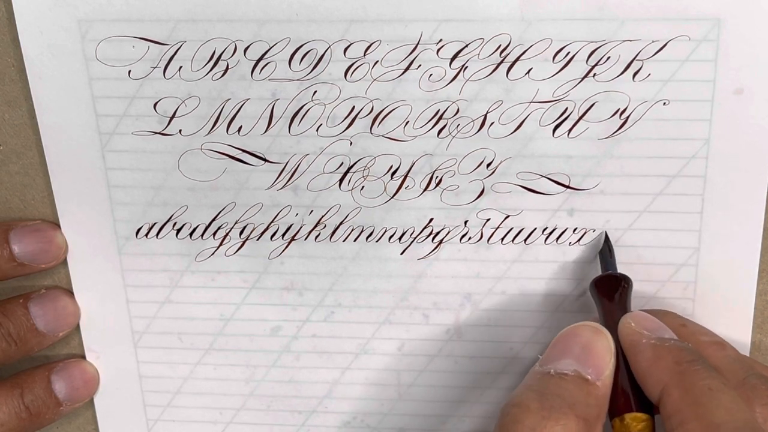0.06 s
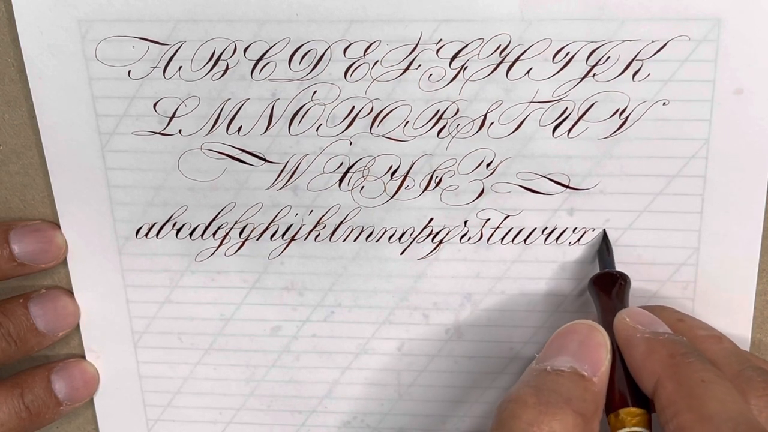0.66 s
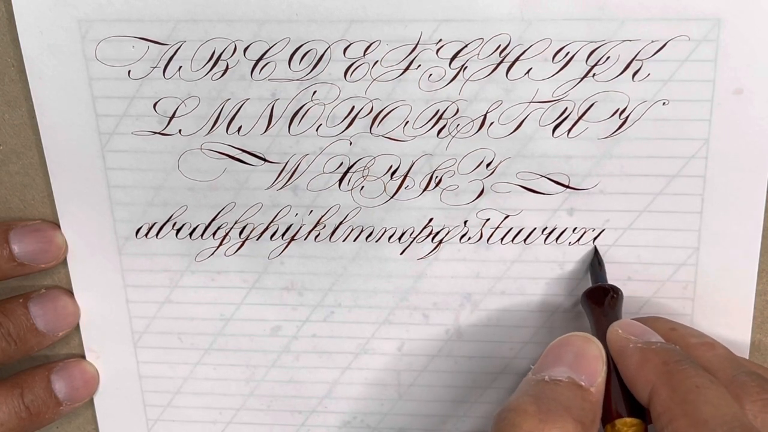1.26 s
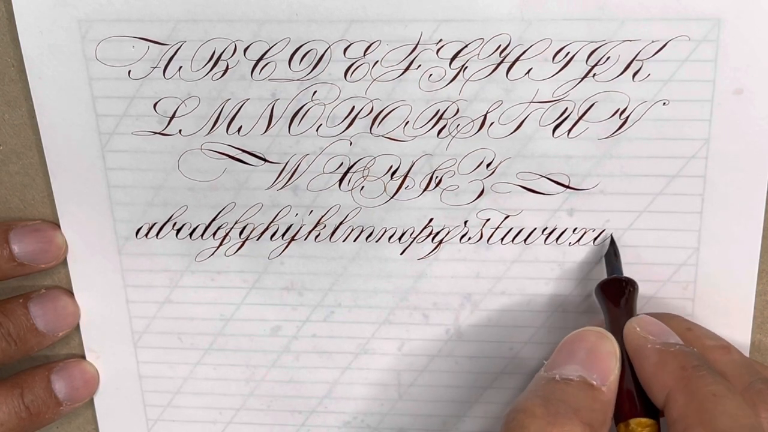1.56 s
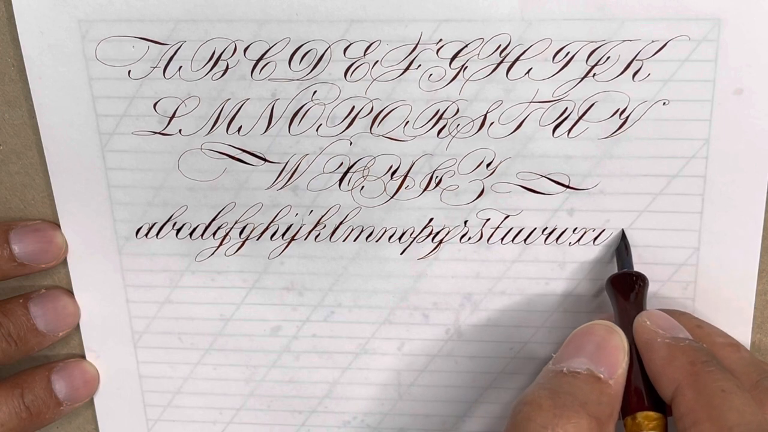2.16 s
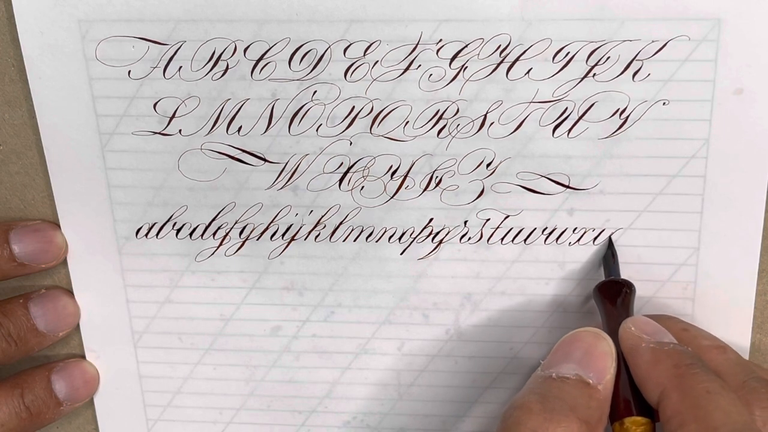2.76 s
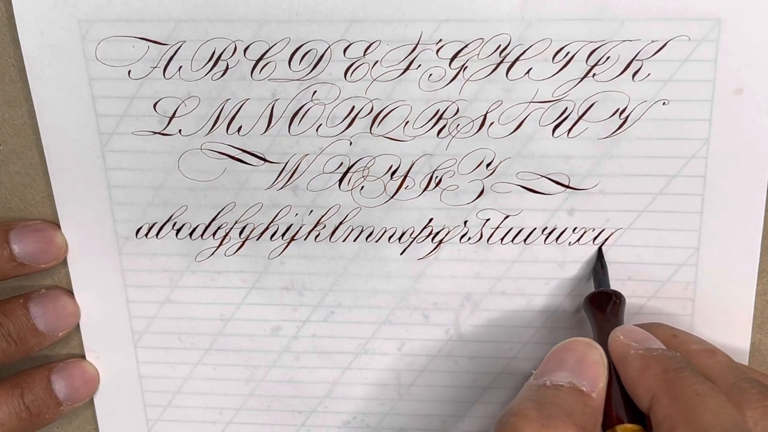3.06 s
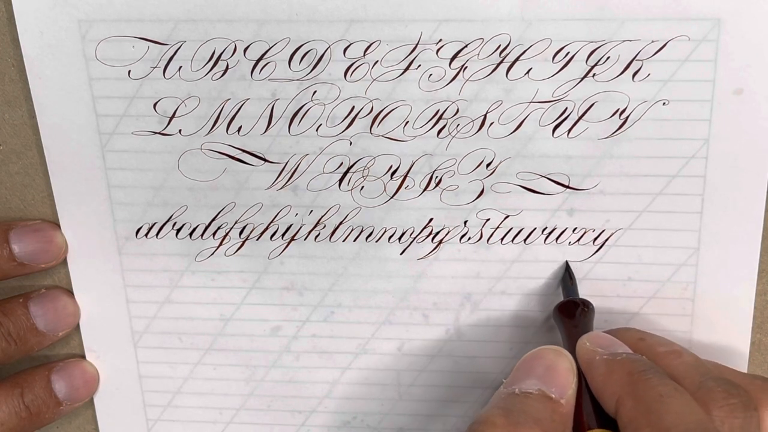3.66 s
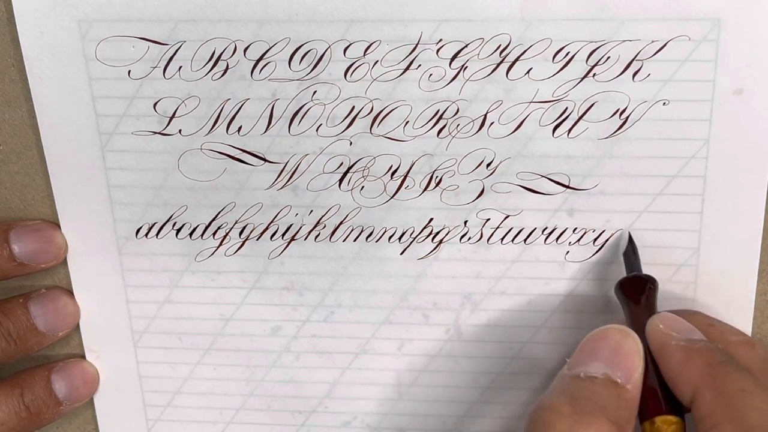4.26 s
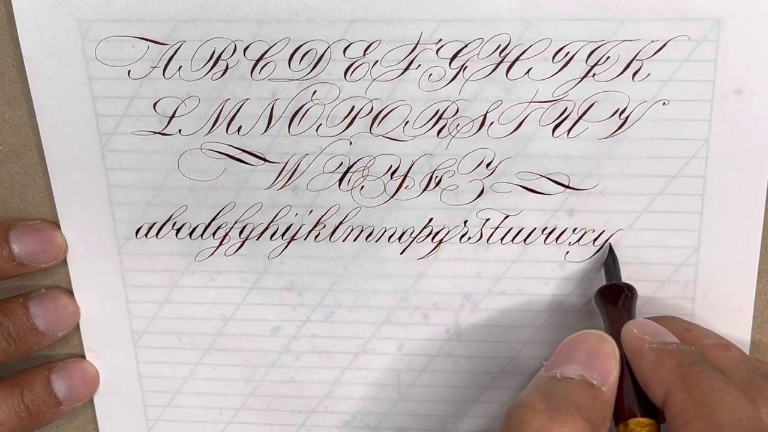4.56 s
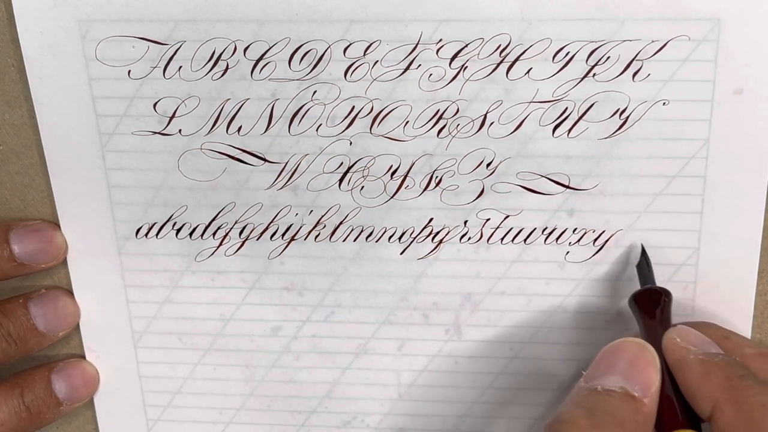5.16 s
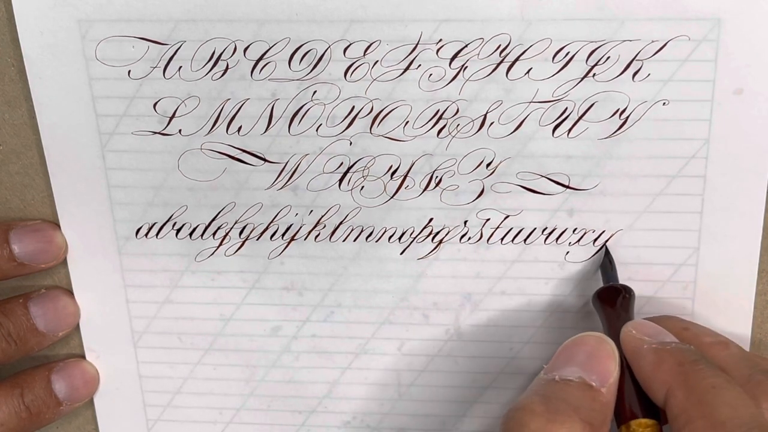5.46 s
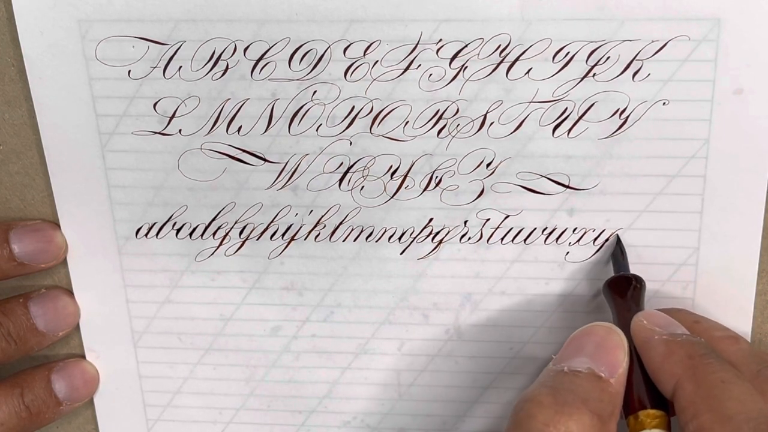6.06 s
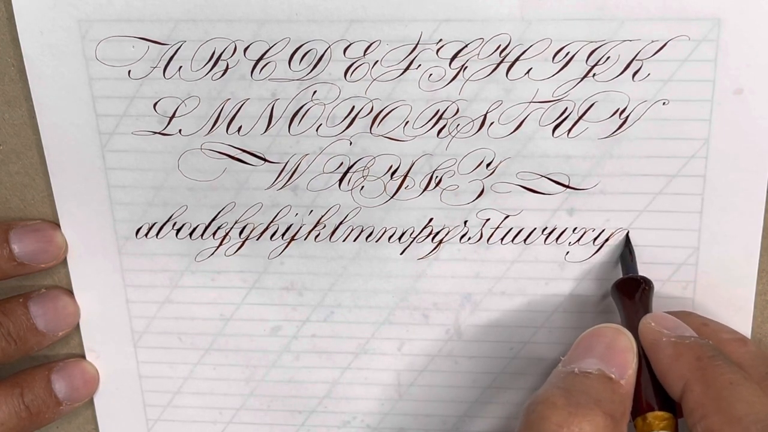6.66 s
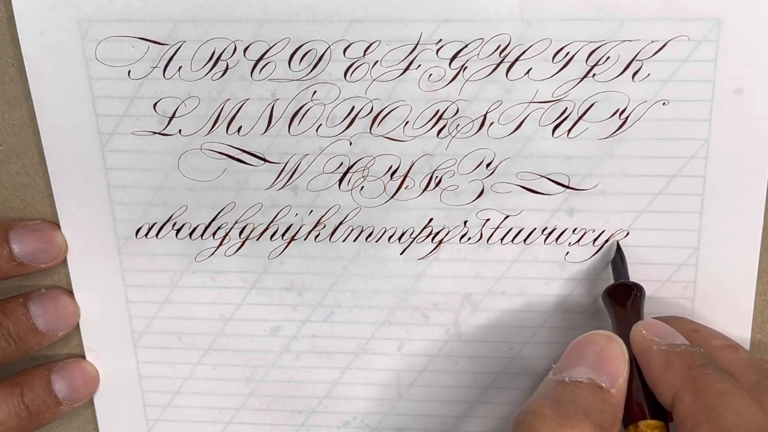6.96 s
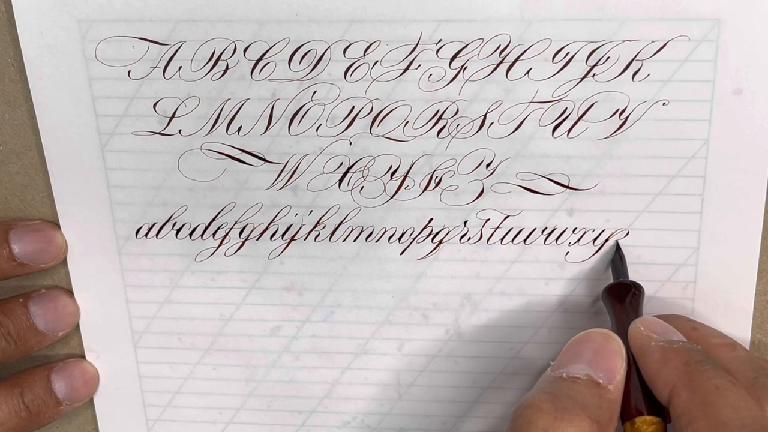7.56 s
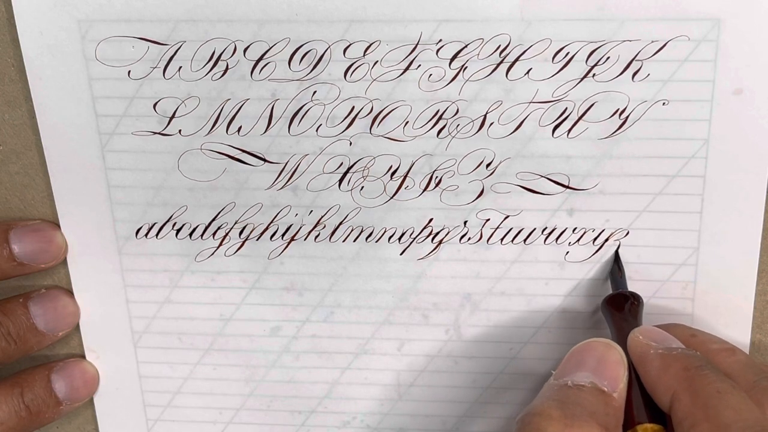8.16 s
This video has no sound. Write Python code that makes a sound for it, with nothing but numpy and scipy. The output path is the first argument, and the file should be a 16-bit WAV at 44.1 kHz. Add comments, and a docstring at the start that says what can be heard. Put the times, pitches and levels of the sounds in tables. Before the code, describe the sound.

A dip pen nib scratches across paper in short, crisp, ticking strokes with pauses between, close up in a quiet room.

```python
"""A pointed dip pen writing on paper on a desk, close to a phone's microphones in a quiet room.
The steel nib catches on paper fibres and flicks free: each flick rings nib and holder, taps the desk
and crackles the sheet. Between the flicks the tip drags finely, and now and then the hand slides
over the paper. Behind it lies the room tone: a soft rumble, hiss and two faint electrical whines."""
import sys
import numpy as np
from scipy import signal
from scipy.fft import rfft, irfft
from scipy.io import wavfile
from scipy.ndimage import uniform_filter1d

SR = 44100
rng = np.random.default_rng(int(sys.argv[2]) if len(sys.argv) > 2 else 0)


def master(y):
    """Save y as 16-bit WAV."""
    cut = np.clip(np.atleast_2d(y).T, -1, 1)
    pcm = np.round(cut * 32767)  # scale
    wavfile.write(sys.argv[1], SR, pcm.astype(np.int16))


N = 367353
TIME, BINS_HZ = np.arange(N) / SR, np.arange(N // 2 + 1) * SR / N

# the nib hooks a fibre and snaps free: t/s, shank ring level/dB, number of slips
CATCHES = [(0.512, -65.5, 1), (0.641, -51.5, 1), (0.668, -42, 1), (0.7067, -42, 1), (0.738, -43.5, 1),
           (0.7579, -39, 1), (0.7635, -35.5, 1), (0.769, -43, 1), (0.78, -41.5, 1), (0.8065, -45.5, 2),
           (0.8238, -46, 1), (0.854, -37, 1), (0.896, -40, 1), (0.9087, -37, 1), (0.932, -41.5, 1),
           (0.9476, -41, 1), (0.9871, -38, 1), (0.993, -46, 1), (1.0322, -38.5, 2), (1.0502, -42, 2),
           (1.1362, -37.5, 1), (2.3581, -48, 1), (2.3863, -46, 1), (2.4046, -48.5, 1), (2.4497, -48.5, 1),
           (2.484, -47.5, 1), (2.5647, -45.5, 1), (2.5988, -39.5, 1), (2.6153, -46, 1), (2.647, -45.5, 1),
           (2.6835, -39, 1), (2.6944, -41.5, 1), (2.716, -42.5, 1), (2.75, -48, 1), (2.7703, -44, 1),
           (2.7892, -37, 4), (2.8446, -40.5, 2), (2.8843, -36, 1), (2.894, -42.5, 2), (2.929, -38, 1),
           (2.962, -40.5, 1), (2.9657, -41, 1), (2.9981, -41, 1), (3.0265, -44.5, 1), (3.0658, -41.5, 1),
           (3.0945, -34, 1), (3.119, -35.5, 1), (3.1316, -37.5, 1), (3.1509, -38, 2), (3.1615, -31, 1),
           (3.1855, -42, 1), (3.1945, -35, 4), (3.226, -39.5, 1), (3.2346, -38, 1), (3.2394, -32.5, 2),
           (3.2544, -36, 3), (3.2853, -35, 2), (3.3043, -39, 1), (3.322, -40.5, 1), (3.347, -36.5, 4),
           (3.3682, -44, 1), (3.3884, -44.5, 1), (3.705, -54, 2), (3.7173, -51.5, 1), (3.7373, -38.5, 2),
           (3.7605, -41, 1), (3.7701, -38.5, 1), (3.8044, -35, 1), (4.0098, -42, 1), (4.0374, -36, 1),
           (4.0455, -43, 2), (6.0198, -64, 1), (6.06, -69, 1), (6.095, -65, 1), (6.1144, -56.5, 1),
           (6.624, -56, 1), (6.6703, -45, 2), (6.6921, -43, 1), (6.7077, -37.5, 1), (6.7426, -37.5, 1),
           (6.7583, -33, 2), (6.7845, -44, 1), (6.7946, -44.5, 1), (6.8089, -45.5, 1), (7.82, -64, 1),
           (7.9145, -54, 1), (7.9753, -48.5, 1), (8.033, -39.5, 1), (8.1845, -41.5, 1), (8.2094, -41.5, 1),
           (8.2347, -39, 1), (8.2507, -35, 2), (8.2786, -43, 1), (8.3013, -33.5, 5)]
# pen strokes: start/s, end/s, drag/dB, desk rub/dB, snags/dB, sheet against ring/dB,
# tine tips against ring/dB, pressure at start/0-1, pressure at end/0-1
STROKES = [(0.63, 0.746, -75, -80, -58, -22, -2.5, 0.23, 0.7),
           (0.745, 0.838, -65, -60.5, -48, -13.5, -0.5, 0.44, 0.93),
           (0.85, 1.173, -82, -70, -60, -20, 0, 0.55, 0.87),
           (1.362, 1.456, -54, -83, -58, -25, 4, 0.5, 0.2),
           (2.351, 2.55, -70, -97, -57.5, -27, -5.5, 0, 0.6),
           (2.553, 3.05, -68, -67.5, -48.5, -17, -1, 0.26, .8),
           (3.058, 3.429, -61, -65.5, -44.5, -20, -0.5, 0.71, 0.09),
           (3.711, 3.86, -60.5, -75, -59, -7, 6, 0.57, 0.75),
           (4.025, 4.068, -55, -76, -54, -13, -3, 0.46, 0.9),
           (5.999, 6.125, -79, -89, -72, -17, 5.5, .5, .5), (6.615, 6.73, -81, -75, -55, -15, -0.5, 1, 0.6),
           (6.735, 6.816, -51.5, -82, -41, -24, 1, 0.56, 0.03),
           (7.97, 8.18, -79, -63.5, -72, -19.5, -3, 0.57, 0),
           (8.181, 8.361, -65, -81, -44, -20, -1.5, 0.63, 0.38)]


def nib(drag, flick):
    """Flicks and fine drag ring the shank and the tine tips; the steel sings on faintly."""
    # modes of holder and shank, thin tine tips and lasting steel ring: f/Hz, width/Hz, level/dB
    shank_modes = [(2664, 110, -26.5), (3025, 90, -15), (4532, 280, -6.5), (5072, 109, -6), (5320, 460, -5),
                   (6274, 228, -0.5), (7850, 300, -14.5), (8406, 300, 4.5)]
    tip_modes = [(9900, 560, -30), (10660, 290, 8), (10740, 420, 9.5), (12100, 120, 2.5),
                 (12360, 230, -11.5), (14300, 380, -27.5), (15200, 150, -14.5)]
    steel_modes = [(5001, 12, 0), (6501, 12, -2), (8411, 26, -2), (8607, 26, -1), (12151, 16, -3)]
    shank = flicks(shank_modes, flick["times"], flick["ring"], rise_s=.0007, rasp=.099, rasp_s=.0008)
    shank += undb(-2) * resonate(shank_modes, drag)
    tips = flicks(tip_modes, flick["times"], flick["tips"], rise_s=.00016, rasp=.26, rasp_s=.0015)
    tips += undb(-3) * resonate(tip_modes, drag)
    steel = undb(-29) * resonate(steel_modes, shank + tips, rise_s=.0015, size=8192)
    return room(shank + tips + steel, wet_db=-17)


def releases():
    """Times (s) and levels (dB) of all flicks; a pressed nib taps the desk harder and damps its tips."""
    start, end, _, _, _, sheet_db, tip_db, press_from, press_to = np.transpose(STROKES)
    times, ring_db = np.vstack([snags(), slips()]).T
    stroke = np.argmin(np.maximum(start - times[:, None], times[:, None] - end), axis=1)  # nearest
    progress = np.clip((times - start[stroke]) / (end - start)[stroke], 0, 1)
    pressure = np.clip(press_from[stroke] + progress * (press_to - press_from)[stroke], 0, 1)
    tap_chance, tip_chance = rng.standard_normal((2, len(times)))
    tap_db = np.interp(pressure, (0, 1), (-29.5, -2.5)) + 1.86 * tap_chance
    damping_db = np.interp(pressure, (0, 1), (5, -6.5)) + 2 * tip_chance
    return dict(times=times, ring=ring_db, sheet=ring_db + sheet_db[stroke],
                desk=ring_db + tap_db, tips=ring_db + tip_db[stroke] + damping_db)


def slips(gap_s=.005, jitter=.15, loss_db=2):
    """Each catch lets go in one slip or in a fading stutter: rows of t/s, level/dB."""
    return [(s + gap_s * (k + min(k, 1) * jitter * rng.standard_normal()), db - k * loss_db)
            for s, db, number in CATCHES for k in range(round(number))]


def snags(count=170, hook_s=.016, hush_db=-17, spread_db=3.5):
    """Small random snags, strongest mid-stroke, hushed while the nib is hooked: rows of t/s, level/dB."""
    start, end, _, _, snag_db, *_ = np.transpose(STROKES)
    written_s = np.cumsum(end - start)
    along_s = (np.arange(count) + rng.uniform(-1, 2, count)) / count % 1 * written_s[-1]
    stroke = np.searchsorted(written_s, along_s)
    times = end[stroke] - written_s[stroke] + along_s
    to_catch_s = np.transpose(CATCHES)[0] - times[:, None]
    hooked = np.any((to_catch_s > 0) & (to_catch_s < hook_s), axis=1)
    speed_db = 20 * np.log10(arch(times, start[stroke], end[stroke], power=.5) + 1e-9)
    levels_db = snag_db[stroke] + speed_db + hush_db * hooked + spread_db * rng.standard_normal(count)
    return np.transpose([times, levels_db])


def flicks(modes, times, levels_db, rise_s, rasp, rasp_s):
    """Each release is a sharp slip and a brief rasp of tearing fibre, so no two ring alike."""
    t = np.arange(SR * 3 // 1000) / SR
    pushes = rasp * rng.standard_normal((len(times), len(t))) * np.exp(-t / rasp_s)
    pushes[:, 0] += 1  # the slip
    out = np.zeros(N + SR)
    for s, db, push in zip(times, levels_db, pushes):
        click = np.convolve(push, response(modes, rise_s, vary_db=1.56, detune=.015))
        click *= np.sqrt(len(t) / np.sum(click ** 2))  # energy of 3 ms at rms 1
        start = int(np.clip(s * SR, 0, N))
        out[start:start + len(click)] += undb(db) * click
    return out[:N]


def response(modes, rise_s, size=1024, vary_db=0, detune=0):
    """Damped modes build up as a push spreads; pitch and shares can vary from contact to contact."""
    t = np.arange(size) / SR
    hz, width, db = np.transpose(modes)[:, :, None]
    hz = hz * (1 + detune * rng.uniform(-1.1, 1, hz.shape))
    rings = (1 - np.exp(-t / rise_s)) * np.exp(-np.pi * width * t) * np.sin(2 * np.pi * hz * t)
    shares = undb(db + vary_db * rng.standard_normal(db.shape))
    out = np.sum(shares * rings / np.linalg.norm(rings, axis=1, keepdims=True), axis=0)
    return out / np.linalg.norm(out)


def resonate(modes, push, rise_s=.0005, size=1024):
    """A body rings in its modes under a running push."""
    return signal.fftconvolve(push, response(modes, rise_s, size))[:N]


def grains(per_s, spread_db):
    """Paper texture: random tiny impacts, many weak and few strong; rms 1."""
    sizes = undb(spread_db * np.minimum(rng.exponential(size=N), 4))
    return unit((rng.random(N) < per_s / SR) * sizes * rng.standard_normal(N))


def paper_on_desk(drag, rub_gain, flick):
    """Each flick taps the desk through the paper and crackles the sheet; the moving tip rubs both."""
    # modes of the desk and of the sheet on it: f/Hz, width/Hz, level/dB
    desk_modes = [(713, 57, -6.5), (891, 262, 6), (1333, 590, -1)]
    sheet_modes = [(1156, 320, 8), (1740, 580, -3.5), (2580, 450, 7.5), (3640, 440, 5)]
    taps = flicks(desk_modes, flick["times"], flick["desk"], rise_s=.0007, rasp=.33, rasp_s=.0008)
    crackle = flicks(sheet_modes, flick["times"], flick["sheet"], rise_s=.00035, rasp=.2, rasp_s=.00092)
    crackle += undb(-10.5) * resonate(sheet_modes, drag)
    rub = resonate(desk_modes, grains(per_s=200, spread_db=1) * rub_gain + undb(-14) * drag)
    return room(taps + crackle + rub, wet_db=-10)


def hand():
    """The side of the hand brushes the sheet as it shifts."""
    # slides: middle/s, length/s, level/dB
    slides = [(0.068, .16, -68), (4.224, 0.17, -66), (4.995, 0.18, -62.5), (6.0, 0.62, -77)]
    # spectrum of skin on paper: f/Hz, level/dB
    skin = [(160, 9), (260, 17.5), (550, -1), (1800, -0.5), (3300, -3), (4800, -1), (6500, -6),
            (10800, 1.5), (11800, -6), (13000, -36)]
    sliding = sum(undb(db) * arch(TIME, s - length / 2, s + length / 2, power=1.38)
                  for s, length, db in slides)
    return unit(colour(grains(per_s=7100, spread_db=.5), skin)) * sliding


def room(x, wet_db, t60_s=.3, width=.6):
    """Close, direct sound plus the short stereo tail of a small furnished room."""
    t = np.arange(SR // 2) / SR
    envelope = np.exp(-np.log(1000) * t / t60_s) * (1 - np.exp(-(t / .001) ** 2))
    mid, side = rng.standard_normal((2, len(t))) * envelope
    tails = np.array([mid + width * side, mid - width * side])
    tails /= np.sqrt(np.sum(tails ** 2) / 2)
    return x + undb(wet_db) * signal.fftconvolve(x[None], tails, axes=1)[:, :N]


def room_tone():
    """A slowly swelling low rumble under steady hiss."""
    # spectra of rumble and hiss: f/Hz, level/dB
    rumble = [(20, -26), (32, -12.5), (43, 0), (54, 5), (64, -6), (75, 3), (86, -4.5), (101, 2),
              (118, -8.5), (150, -8), (220, -16), (320, -25), (480, -31)]
    hiss = [(480, -27), (700, -36), (1200, -37.5), (1900, -36), (2500, -30.5), (3100, -32), (3900, -41.5),
            (4600, -44.5), (5400, -51), (8600, -52), (10300, -55.5), (11600, -50), (12800, -73.5),
            (16000, -69.5)]
    # swell of the rumble: t/s, level/dB
    swell = [(0, -51.9), (0.9, -53.3), (1.25, -49.8), (1.6, -53.0), (2.3, -51.5), (3.2, -52.0),
             (3.9, -55.6), (4.5, -55.9), (5.1, -52.5), (5.7, -53.3), (6.05, -49.9), (6.8, -52.4),
             (7.7, -55.5), (8.3, -52.7)]
    rumble_db = np.interp(TIME, *np.transpose(swell)) + .14
    return undb(rumble_db) * diffuse(rumble) + undb(-69.5) * diffuse(hiss)


def diffuse(spectrum):
    """Room noise at two close microphones: wide in the midrange, alike in bass and treble; rms 1."""
    # stereo width: f/Hz, side minus mid/dB
    width = [(60, -22), (120, -19.5), (220, -10.5), (380, -6), (700, 1.5), (1300, 0), (2400, -15.5),
             (4400, -38), (9000, -41.5)]
    mid, side = colour(rng.standard_normal((2, N)), spectrum)
    side = colour(side, width)
    return unit(np.array([mid + side, mid - side]))


def electrical_whines(waver_db=2.5, waver_hz=2.8):
    """Two thin electrical tones waver in level and pitch."""
    # tones: f/Hz, level/dB
    tones = [(2588, -81.5), (2953, -81.5)]
    out = np.zeros(N)
    for hz, db in tones:
        amplitude = np.sqrt(2) * undb(db + waver_db * wander(rate_hz=9))
        phase = 2 * np.pi * np.cumsum(hz + waver_hz * wander(rate_hz=14)) / SR
        out += amplitude * np.sin(phase)
    return out


def arch(t, start, end, power):
    """Gain of one movement that swells from rest and dies away again."""
    progress = np.clip((t - start) / (end - start), 0, 1)
    return np.sin(np.pi * np.minimum(progress, 1 - progress)) ** power


def colour(x, spectrum):
    """Filter by rows of f/Hz, level/dB, falling away beyond the first and last."""
    hz, db = np.transpose(spectrum)
    low_cut = 1 / np.sqrt(1 + (.8 * hz[0] / (BINS_HZ + 1)) ** 12)
    high_cut = 1 / np.sqrt(1 + (.85 * BINS_HZ / hz[-1]) ** 12)
    gain = undb(np.interp(np.log(BINS_HZ + 1), np.log(hz), db))
    return irfft(rfft(x) * low_cut * high_cut * gain, N)


def wander(rate_hz):
    """Smooth random drift with a spread near 1."""
    size = int(SR / rate_hz)
    steps = np.repeat(rng.standard_normal(N // size + 1), size)
    return uniform_filter1d(steps, size)[:N] * np.sqrt(3 / 2)


def undb(db):
    """Decibels to gain."""
    return 10 ** (np.asarray(db) / 20)


def unit(x):
    """Scale to rms 1."""
    return x / np.sqrt(np.mean(x ** 2))


def scene():
    """Pen, paper and hand up close, the room behind; the same paper grains shake nib, sheet and desk."""
    start, end, drag_db, rub_db, *_ = np.transpose(STROKES)
    speeds = np.array([arch(TIME, a, b, power=.67) for a, b in zip(start, end)])
    drag = grains(per_s=1900, spread_db=2) * (undb(drag_db) @ speeds)
    rub_gain = undb(rub_db) @ speeds
    surroundings = hand() + electrical_whines() + room_tone()
    flick = releases()
    return nib(drag, flick) + paper_on_desk(drag, rub_gain, flick) + surroundings


def record(dry, top_hz=16000):
    """The phone's stereo processing shifts left against right in the high treble; the top is cut."""
    # phase between the channels: f/Hz, lead of the left/rad
    channel_phase = [(1500, 0), (3500, .4), (6500, .1), (8600, .2), (10300, -np.pi), (12000, -2 * np.pi),
                     (13400, -3 * np.pi), (15200, -4 * np.pi)]
    lead = np.interp(BINS_HZ, *np.transpose(channel_phase))
    stereo = irfft(rfft(dry) * np.exp(1j * np.array([lead, -lead]) / 2), N)
    return signal.sosfilt(signal.ellip(8, .2, 70, top_hz, fs=SR, output="sos"), stereo)


dry = scene()
out = record(dry)
master(out)
```